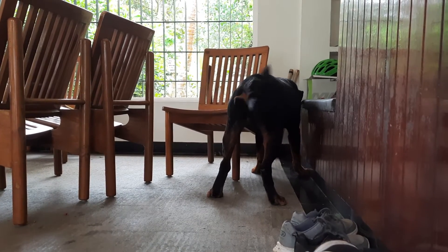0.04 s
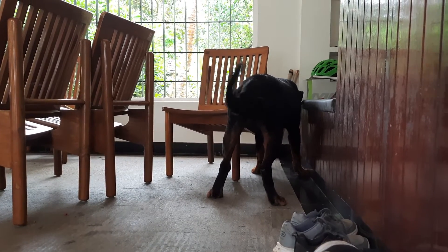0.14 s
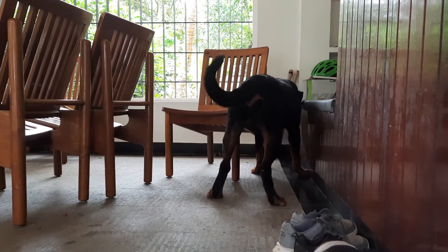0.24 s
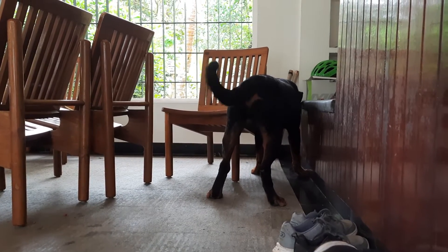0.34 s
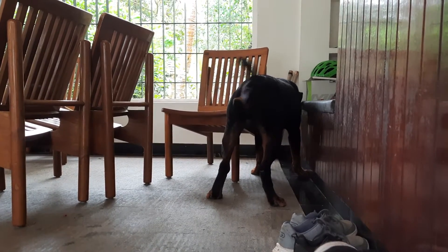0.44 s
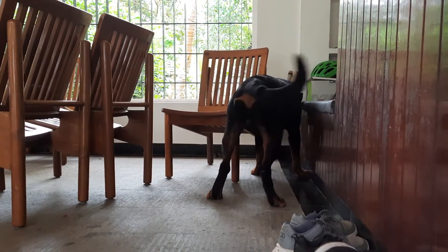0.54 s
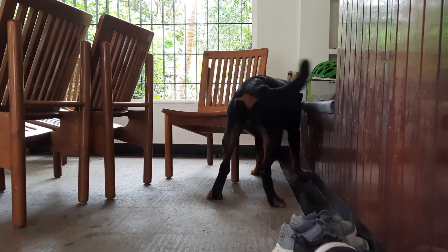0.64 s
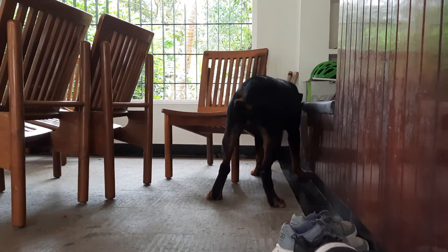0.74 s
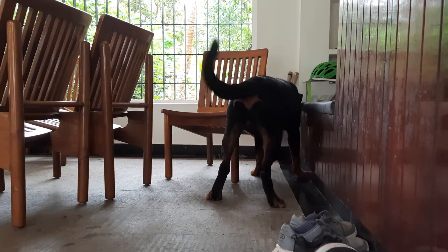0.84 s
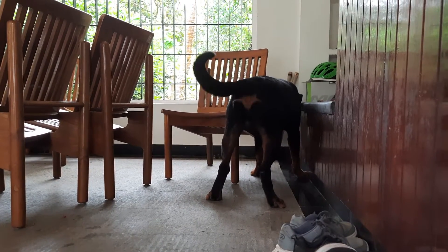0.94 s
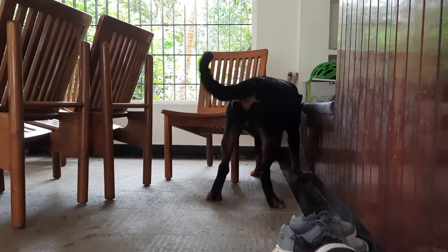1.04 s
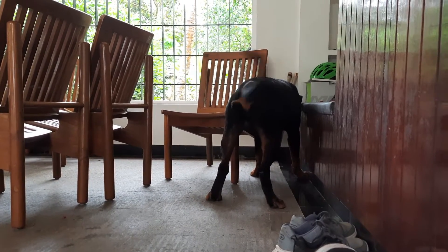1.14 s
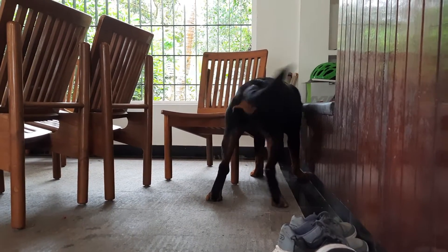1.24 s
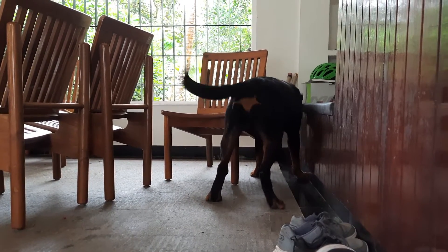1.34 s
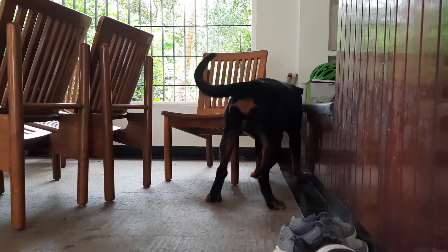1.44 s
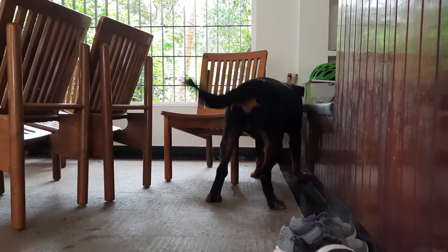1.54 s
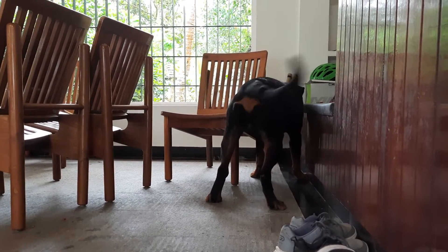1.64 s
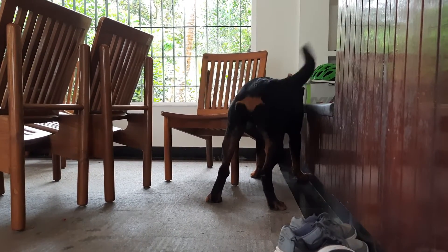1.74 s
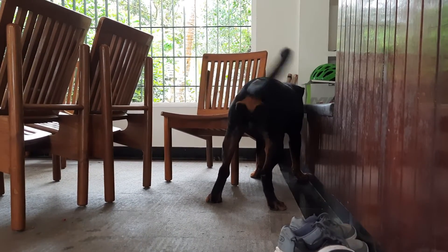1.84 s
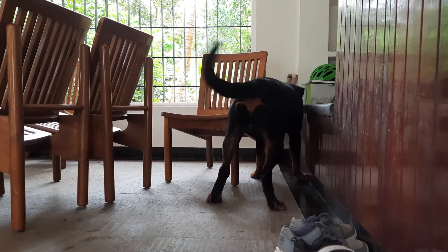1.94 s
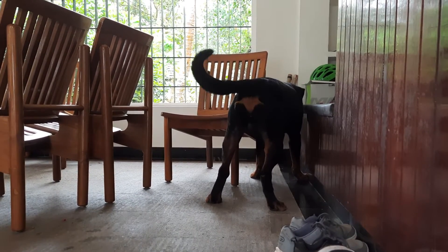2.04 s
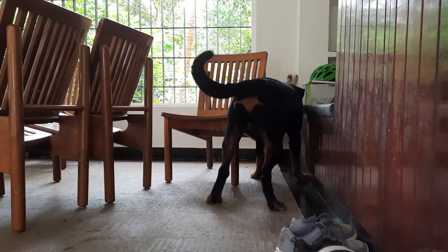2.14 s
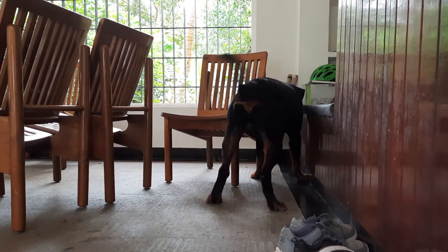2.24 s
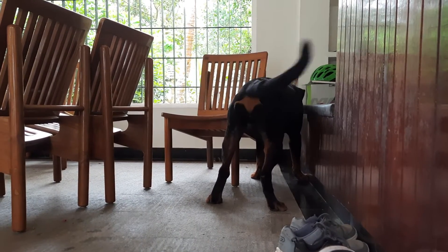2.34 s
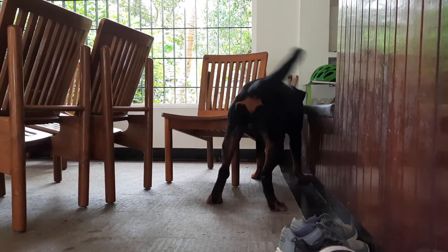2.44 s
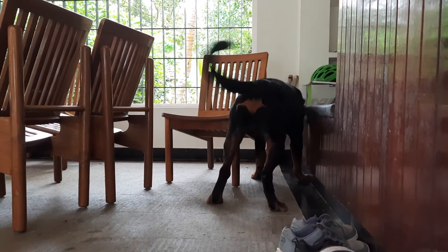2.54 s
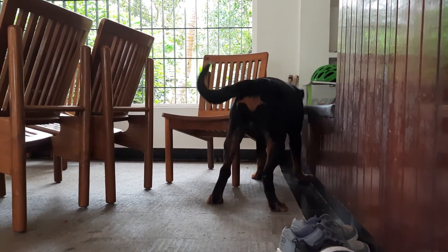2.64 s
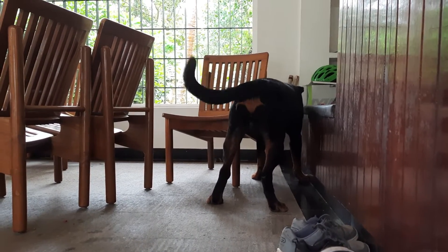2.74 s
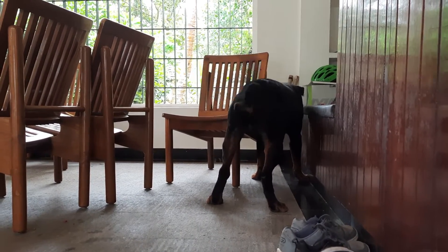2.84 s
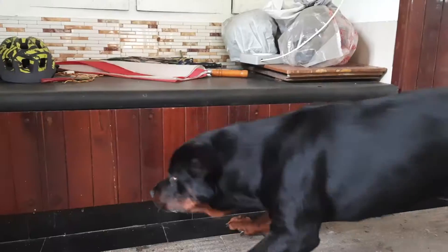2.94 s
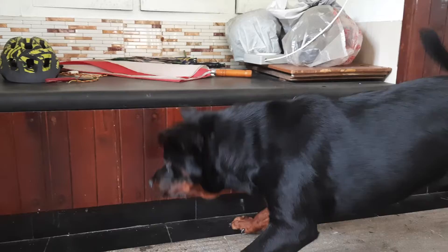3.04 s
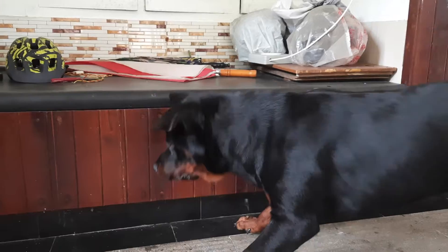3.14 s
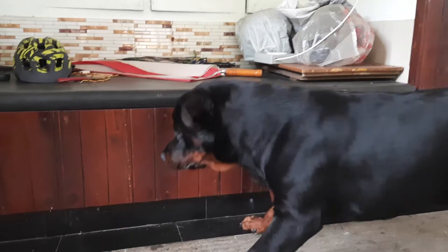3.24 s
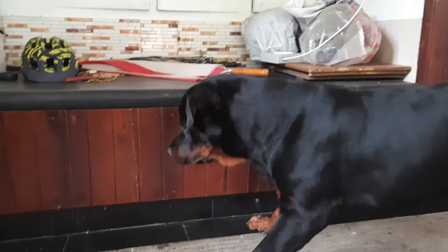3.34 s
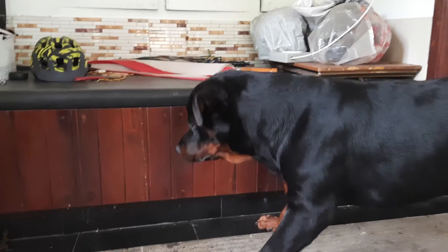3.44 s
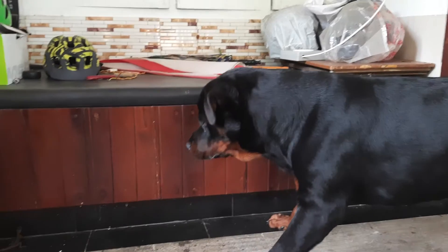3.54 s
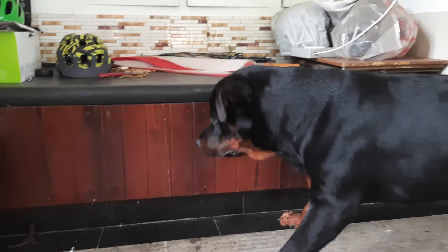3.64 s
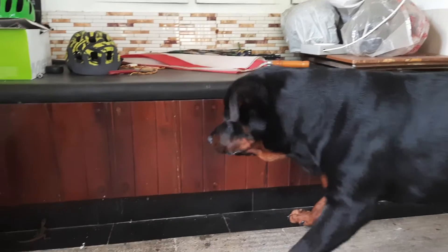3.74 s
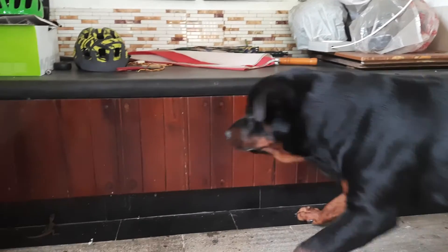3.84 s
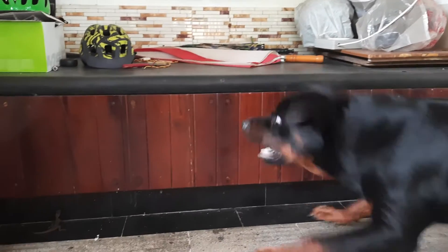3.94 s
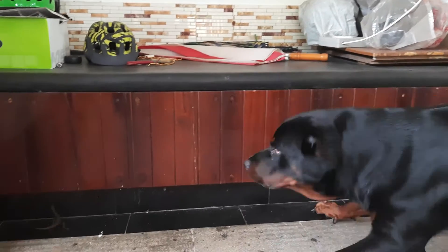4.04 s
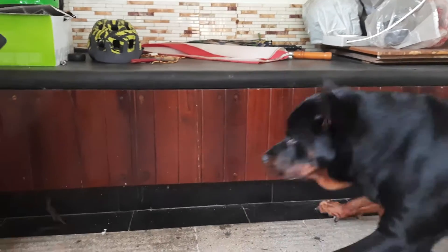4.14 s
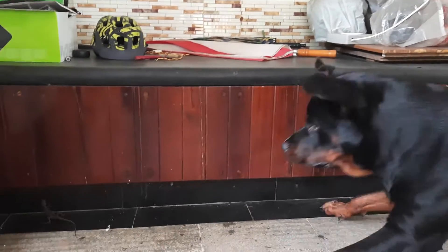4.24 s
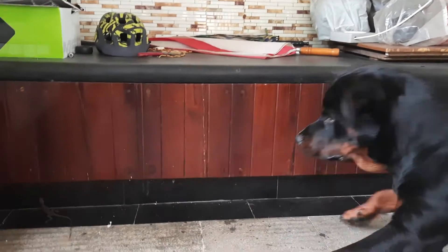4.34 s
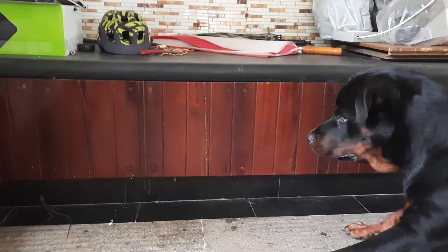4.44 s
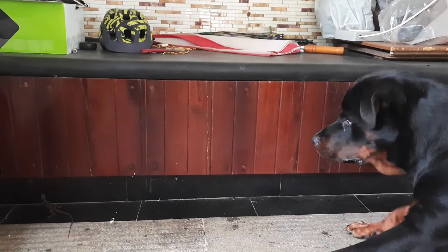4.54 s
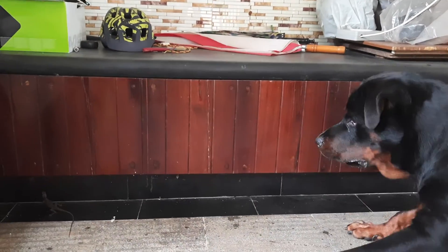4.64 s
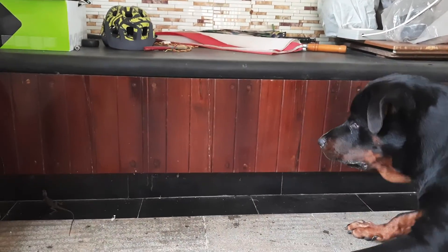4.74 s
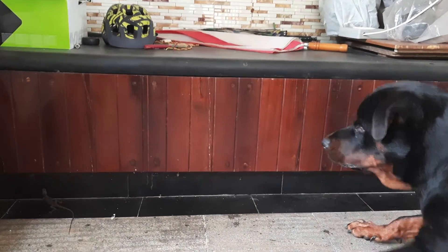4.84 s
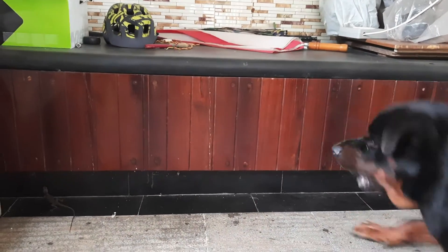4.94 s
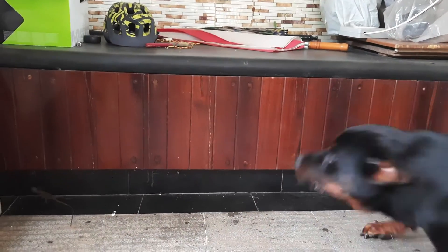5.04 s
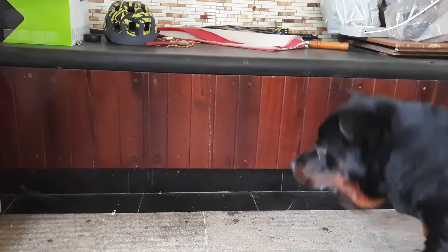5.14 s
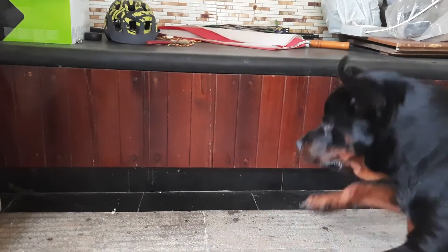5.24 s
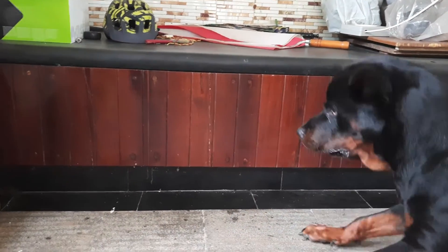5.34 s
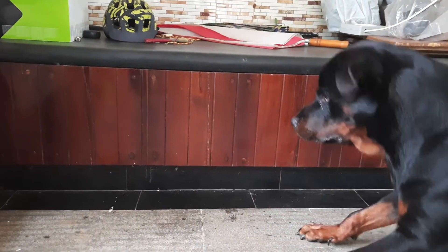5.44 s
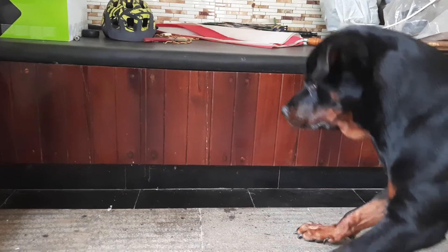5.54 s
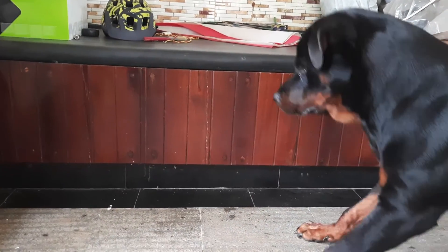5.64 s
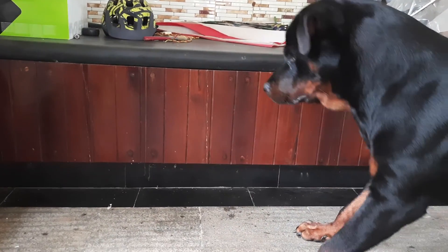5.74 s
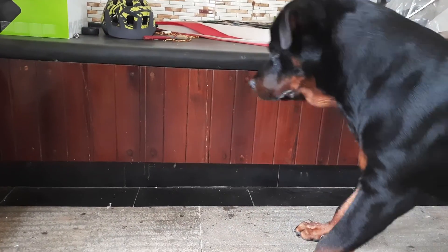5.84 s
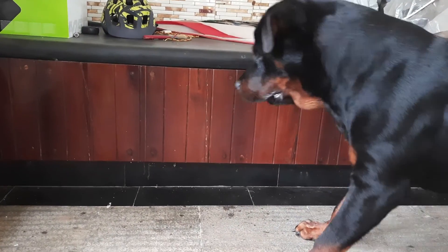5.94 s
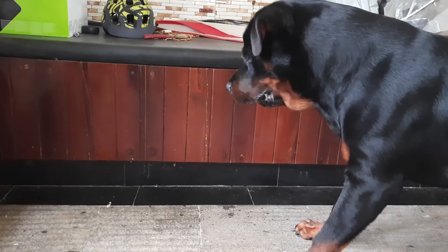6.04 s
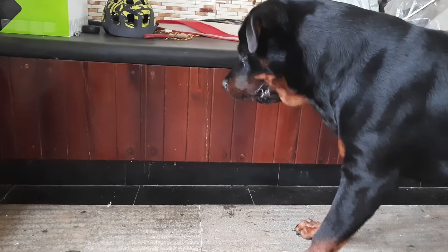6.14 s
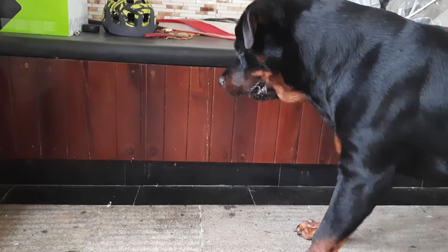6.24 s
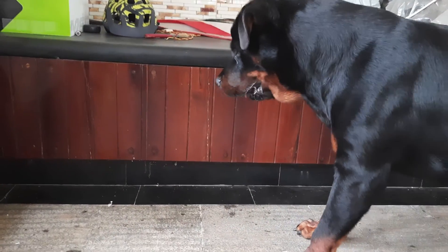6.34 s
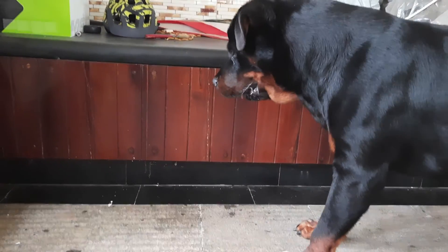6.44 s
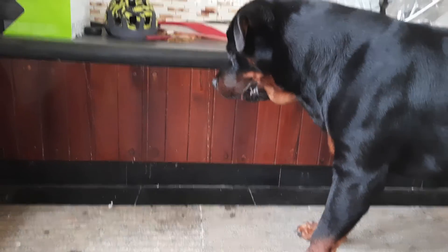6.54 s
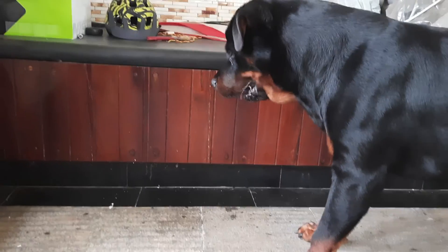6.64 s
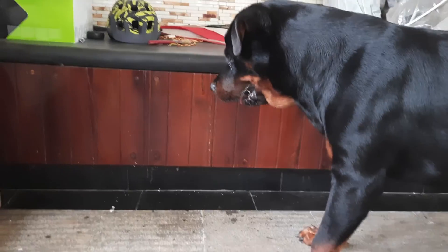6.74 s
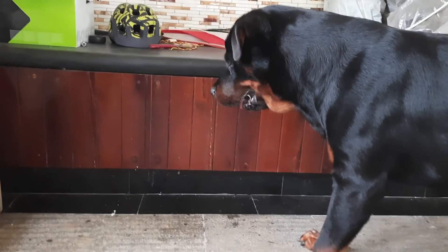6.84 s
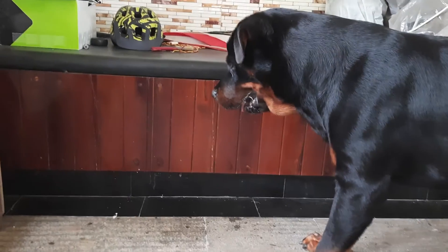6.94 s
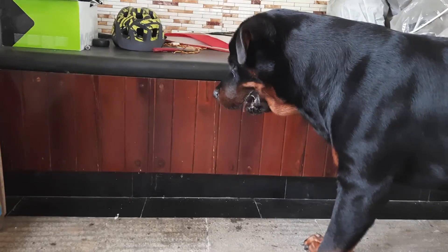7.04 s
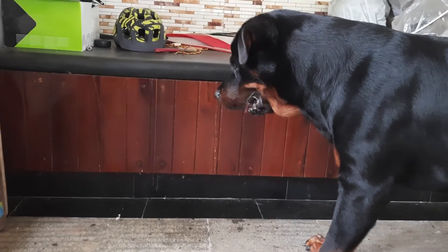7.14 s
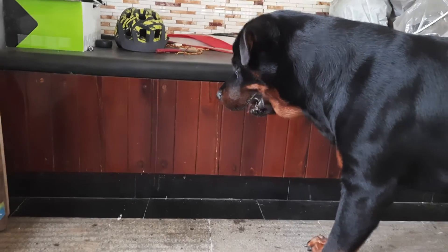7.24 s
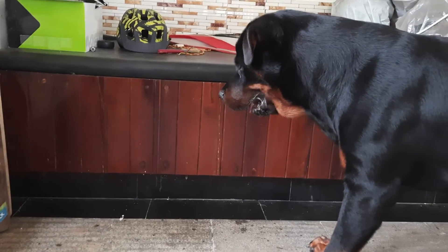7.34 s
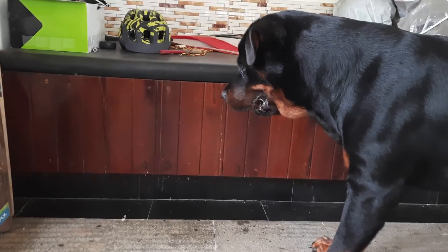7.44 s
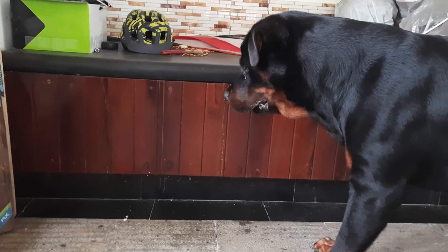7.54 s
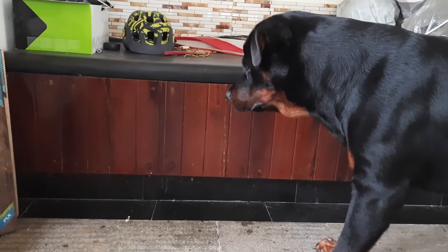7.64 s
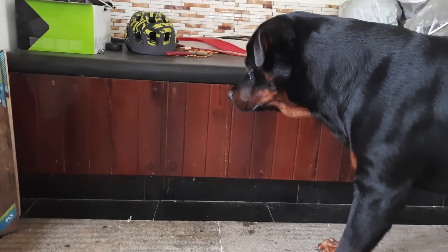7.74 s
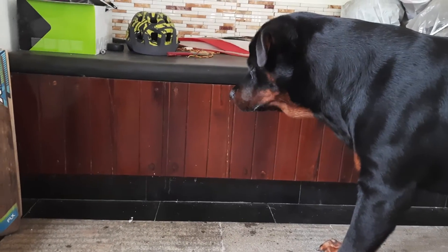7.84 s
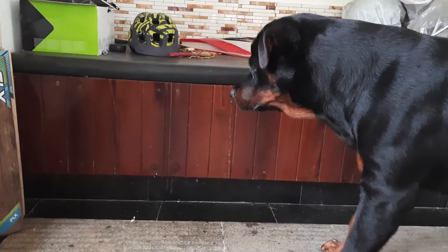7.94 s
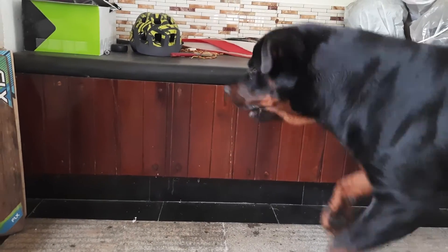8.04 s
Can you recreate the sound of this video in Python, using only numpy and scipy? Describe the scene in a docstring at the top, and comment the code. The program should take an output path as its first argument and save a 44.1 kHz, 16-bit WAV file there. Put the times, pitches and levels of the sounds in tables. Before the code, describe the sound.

Four powerful, hoarse barks, each led in by a growl of separate flaps, come unevenly from a large dog nearby. Thin whimpers, dull thuds and scraping claws fill some gaps; later there are breathy pants while a distant engine hums past. A fifth bark begins right at the end. Hard walls and floor give quick echoes and a half-second ring; background rumble dips, then rises.

```python
"""A young, large dog growls and barks four times on a tiled veranda, and starts a fifth bark.
Each bark is a buzz of rough pulses and air, shaped by throat, cheeks and jaws, and it arches in pitch.
The growls before the barks are runs of separate flaps that ring the chest, mouth and muzzle.
In between come whimpers, panting, claw scuffs and dull, fading thuds, made of shaped tones and noise.
The hard room answers with echoes and a tail; traffic noise and a far engine hum behind it, in uneven level."""
import sys
import numpy as np
from scipy import signal
from scipy.fft import rfft, irfft, next_fast_len
from scipy.io import wavfile
from scipy.ndimage import uniform_filter1d, minimum_filter1d

SR = 44100
rng = np.random.default_rng(int(sys.argv[2]) if len(sys.argv) > 2 else 0)


def transcribe(signal):
    """Save signal, clipped to [-1, 1], as a 16-bit WAV file at the path in sys.argv[1]."""
    frames = np.atleast_2d(signal).T
    limited = np.clip(frames, -1, 1)
    pcm = np.round(limited * 32767).astype(np.int16)
    wavfile.write(sys.argv[1], SR, pcm)


N = 357210
TIME = np.arange(N) / SR


def from_db(db):
    """Turn decibels into a gain."""
    return 10 ** (np.asarray(db) / 20)


def rms_one(x):
    """Scale a sound to an average (rms) level of 1."""
    return x / np.sqrt(np.mean(x ** 2) + 1e-20)


def in_time(rows, t=TIME):
    """Read the columns of a table at times t, with straight lines between its rows."""
    s, *columns = np.transpose(rows)
    return [np.interp(t, s, column) for column in columns]


def at_hz(points, hz):
    """Read a table by frequency, on a logarithmic scale like the ear's."""
    freq, value = np.transpose(points)
    return np.interp(np.log(np.maximum(hz, 1)), np.log(freq), value)


def coloured(x, spectrum):
    """Give a sound a smooth spectrum that falls away beyond its ends."""
    size = next_fast_len(x.shape[-1] + 2048)
    hz = np.arange(size // 2 + 1) * SR / size + 1
    low_end = np.minimum(hz / spectrum[0][0], 1) ** 2
    high_end = np.minimum(spectrum[-1][0] / hz, 1) ** 4
    gain = from_db(at_hz(spectrum, hz)) * low_end * high_end
    return irfft(rfft(x, size) * gain, size)[..., :x.shape[-1]]


def band(x, low_hz, high_hz, order=2):
    """Keep only the sound between two frequencies (Butterworth band-pass)."""
    edges = [low_hz, min(high_hz, SR / 2 - 500)]
    return signal.sosfilt(signal.butter(order, edges, "band", fs=SR, output="sos"), x)


def resonance(x, hz, width_hz):
    """Ring at one frequency (two poles), with gain 1 at the top."""
    r = np.exp(-np.pi * width_hz / SR)
    top = np.array([1, 0, -1]) * (1 - r * r) / 2
    return signal.lfilter(top, [1, -2 * r * np.cos(2 * np.pi * hz / SR), r * r], x)


def moving_resonance(x, hz, width_hz):
    """A resonance whose centre follows hz: shift down, smooth, shift back."""
    turn = np.exp(2j * np.pi * np.cumsum(hz) / SR)
    smoother = signal.butter(2, width_hz / 2, fs=SR, output="sos")
    return np.real(turn * signal.sosfilt(smoother, x / turn))


def drift(rate_hz, t):
    """Wander at random: rate_hz chance values a second, joined by straight lines."""
    knots = np.arange(t[0], t[-1] + 1 / rate_hz, 1 / rate_hz)
    return np.interp(t, knots, rng.standard_normal(4096)[:len(knots)])


def evened(x, window_s=0.018):
    """Hold the short-time level near 1, leaving the faster flutter."""
    return x / np.sqrt(np.abs(uniform_filter1d(x * x, int(window_s * SR))) + 1e-12)


def add(out, s, sound):
    """Mix a sound in at time s."""
    start = int(np.clip(round(s * SR), 0, N - 1))
    out[start:start + len(sound)] += sound[:N - start]


# how alike left and right are in diffuse sound: pitch_hz, likeness (1 is the same, 0 is unrelated)
LEFT_RIGHT_LIKENESS = [(60, 1.0051), (250, 0.84), (500, 0.72), (1000, 0.21), (2000, -0.1), (15000, 0.12)]


def diffuse(size):
    """White stereo noise, alike on both sides in the bass and nearly unrelated in the treble."""
    mid, side = rfft(rng.standard_normal((2, size)))
    alike = np.clip(at_hz(LEFT_RIGHT_LIKENESS, np.arange(len(mid)) * SR / size), -1, 1)
    return irfft(np.sqrt((1 + alike) / 2) * mid + np.sqrt((1 - alike) / 2) * side * [[1], [-1]], size)


# level of the background noise, which fades down after the first bark begins and steps up
#   abruptly near 3.26 s: time_s, traffic_rumble_db, air_db
BACKGROUND_LEVELS = [(0, -48, -55), (1.3, -58, -58), (1.8, -72.5, -78), (3.24, -67, -77),
                     (3.28, -65.5, -68.5), (4.7, -60.5, -64), (6.3, -60, -65.5), (7.3, -43.5, -50),
                     (8.1, -48.5, -50)]
# tone colour of the traffic rumble: pitch_hz, relative_level_db
RUMBLE_COLOUR = [(15, -46), (25, -21), (59, -6), (75, 3), (108, -6.5), (135, -5), (263, -10), (293, -13),
                 (454, -15), (600, -20), (780, -51.5), (1320, -120)]
# tone colour of the wash of air: pitch_hz, relative_level_db
AIR_COLOUR = [(210, -33.5), (350, -6.5), (681, -7.5), (824, -9.5), (1080, -8), (1530, -12), (2310, -9),
              (2620, -14), (3280, -17.5), (3550, -17.5), (4500, -17.5), (11100, -27), (15500, -36)]
# tones of the far engine: multiple_of_firing_rate, relative_level_db
ENGINE_TONES = [(1, -7), (1.379, -9.5), (2, 0), (2.5, -4.5), (3.5, -11.5), (4, -8.5)]
ENGINE_HZ = 68.4   # average firing rate
ENGINE_NEAREST_S, ENGINE_PASS_S, ENGINE_DB = 7.25, .6, -46


def outside():
    """Noise makes traffic rumble and a wash of air; a few tones make an engine that nears and passes."""
    rumble_db, air_db = in_time(BACKGROUND_LEVELS)
    nearness = 1 / (1 + ((TIME - ENGINE_NEAREST_S) / ENGINE_PASS_S) ** 2)
    phase = 2 * np.pi * np.cumsum(ENGINE_HZ * (1 + 0.0097 * drift(5.1, TIME))) / SR
    tones = sum(from_db(db) * np.sin(k * phase) for k, db in ENGINE_TONES)
    hum = from_db(ENGINE_DB) * nearness * tones
    rumble = from_db(rumble_db) * rms_one(coloured(diffuse(N), RUMBLE_COLOUR))
    air = from_db(air_db) * rms_one(coloured(diffuse(N), AIR_COLOUR))
    return hum + rumble + air


# how long the room's tail takes to fall by 60 dB: pitch_hz, fall_s
TAIL_FALL = [(80, 0.9), (250, 0.55), (500, 0.51), (1200, 0.52), (2500, 0.57), (6000, 0.51), (15000, .42)]
# strength of the room's tail: pitch_hz, level_db
TAIL_LEVEL = [(80, -3.5), (200, -6), (400, -9), (800, -7.5), (2000, 0), (6000, 0.5), (15000, -5.5)]
# strength of the side walls' early echoes: pitch_hz, level_db
WALL_ECHO_LEVEL = [(80, -21), (250, -15), (500, -8.5), (1000, -5.5), (2000, -7), (15000, -1.5)]
# standing waves of the room: pitch_hz, level_db, time_to_fall_60_db_s
STANDING_WAVES = [(330.7, -58.5, 0.23), (496.9, -55, 0.17), (763, -57, 0.18), (484, -76, .75),
                  (731, -87.5, 1), (796, -86, 1)]


def room(x, first_echo_s=0.0018, wall_s=0.0027, build_s=0.0017):
    """Side walls answer first, opposite left and right; a tail dies band by band; standing waves ring."""
    t, edges = np.arange(SR) / SR, 45 * 2 ** np.arange(0, 8.6, .5)
    noise, hz = rfft(diffuse(SR)), np.arange(SR // 2 + 1)
    burst = rng.standard_normal(SR) * np.exp(-t / wall_s) * (t > first_echo_s)
    echoes = rms_one(burst) / np.sqrt(SR)
    response = coloured(echoes, WALL_ECHO_LEVEL) * [[1], [-1]]
    for low, high in zip(edges, edges[1:]):
        centre = np.sqrt(low * high)
        shape = from_db(-60 * t / at_hz(TAIL_FALL, centre)) * (1 - np.exp(-t / build_s))
        tail = irfft(noise * ((hz >= low) & (hz < high)), SR) * shape
        # a wider band carries more of the tail
        width_gain = np.sqrt(2 * (high - low)) / SR
        response += from_db(at_hz(TAIL_LEVEL, centre)) * rms_one(tail) * width_gain
    for mode_hz, db, t60 in STANDING_WAVES:
        response += from_db(db - 60 * t / t60) * np.cos(2 * np.pi * mode_hz * t)
    return signal.fftconvolve(x[None], response, axes=1)[:, :N]


# dull, fading thuds; the one at 3.26 s sounds like the ringing tail of a bark: start_s, level_db
THUDS = [(0.53, -48), (0.603, -35), (3.26, -40), (3.31, -44.5), (4.72, -60)]
# tone colour of the thuds: pitch_hz, relative_level_db
THUD_COLOUR = [(120, -53), (200, -19.5), (445, -0.5), (541, -18.5), (682, -15), (759, 0.5), (1040, -29),
               (1160, -24), (1520, -23.5), (2410, -27.5), (3440, -43), (5080, -38.5), (14000, -49)]


def thuds(fall_60_db_s=0.22):
    """Dull noise that starts at once and fades, then rings in the room."""
    out, t = np.zeros(N), np.arange(SR // 3) / SR
    for s, db in THUDS:
        thud = rms_one(coloured(rng.standard_normal(len(t)), THUD_COLOUR))
        add(out, s, from_db(db - 60 * t / fall_60_db_s) * thud)
    return out


# claws scuffing the floor: start_s, level_db, time_to_fall_30_db_s
CLAW_SCUFFS = [(0.632, -48.5, 0.15), (3.9, -64.5, 0.67), (4.352, -62, 0.16), (4.985, -54, 0.54),
               (5.299, -54.5, 0.13), (5.392, -41.5, 0.012), (7.29, -59, 0.075)]
# tone colour of the claws: pitch_hz, relative_level_db
CLAW_COLOUR = [(1500, -15.5), (3500, -4), (6500, -3), (12000, -6), (16000, -10.5)]


def scuffs():
    """Claws scrape the floor: bright noise of uneven, grainy strength that fades."""
    out, t = np.zeros(N), np.arange(SR // 3) / SR
    for s, db, decay in CLAW_SCUFFS:
        grains = rng.standard_normal(len(t)) * np.exp(.5 * drift(500, t))
        add(out, s, from_db(db - 30 * t / decay) * rms_one(coloured(grains, CLAW_COLOUR)))
    return out


# the dog's puffs of air through the muzzle: start_s, length_s, level_db
PUFFS = [(0.116, 0.17, -47), (6.034, 0.17, -53.5), (6.498, 0.18, -51), (6.665, 0.27, -48.5),
         (6.945, .16, -41), (7.146, 0.23, -40.5), (7.277, 0.035, -36.5), (7.382, 0.15, -41.5)]
# tone colour of the puffs: pitch_hz, relative_level_db
PUFF_COLOUR = [(240, -35), (400, -3), (660, -11), (756, -1), (841, -7.5), (964, -2), (1070, -8.5),
               (1470, -16.5), (1880, -9.5), (2960, -26.5), (5030, -30), (12300, -42), (15000, -47)]


def panting():
    """Soft swells of noisy air, coloured by the muzzle."""
    swell = np.zeros(N)
    for s, length, db in PUFFS:
        along = np.clip((TIME - s) / length, 0, 1)
        swell += from_db(db) * np.sqrt(np.abs(np.sin(np.pi * along)))
    return swell * rms_one(coloured(rng.standard_normal(N), PUFF_COLOUR))


# thin whimpers: start_s, length_s, first_pitch_hz, last_pitch_hz, level_db
WHIMPER_ROWS = [(0, 0.057, 472, 489, -35.5), (0.147, 0.15, 780, 814, -42.5), (4.718, .035, 1800, 1750, -62),
                (5.714, .28, 1098, 1106, -63)]


def whimper(s, length, first_hz, last_hz, db, waver=.012):
    """A nearly pure, unsteady tone through the nose that swells and fades."""
    along = np.clip((TIME - s) / length, 0, 1)
    pitch = first_hz + (last_hz - first_hz) * along
    phase = 2 * np.pi * np.cumsum(pitch * (1 + waver * drift(200, TIME))) / SR
    tone = np.sin(phase) + from_db(-17) * np.sin(2 * phase)
    return from_db(db) * np.sin(np.pi * along) * tone


# bouts of growling: first_flap_s, last_flap_s, first_mouth_db, last_mouth_db, first_chest_db,
#   last_chest_db, first_mouth_hz, last_mouth_hz, lateness_of_swell (a power)
GROWL_BOUTS = [(0.648, 1.191, -36.5, -15.5, -22.5, -20.5, 620, 580, 3.6),
               (2.132, 2.465, -53, -22.5, -56, -40, 560, 700, 2.3),
               (3.826, 3.955, -46, -26.5, -32.5, -27, 650, 770, 0.95),
               (4.874, 4.969, -40.5, -30, -49, -33.5, 582, 600, .55),
               (7.902, 8.055, -39, -16.5, -47, -22, 645, 700, 1.1)]
FLAPS_PER_S, FLAP_JITTER_S, FLAP_SPREAD_DB = 27.5, 0.001, 3.55
GROWL_START_DB, GROWL_START_S = 6.5, .07   # the chest joins in over the first flaps


def flaps():
    """Each bout is a nearly even run of flaps that swells towards its end: (s, mouth dB, chest dB, mouth Hz)."""
    for (first, last, mouth_from, mouth_to, chest_from, chest_to,
         hz_from, hz_to, lateness) in GROWL_BOUTS:
        count = int(round((last - first) * FLAPS_PER_S)) + 1
        for along in np.linspace(0, 1, count):
            swell, chance = along ** abs(lateness), rng.standard_normal(3)
            starting_db = GROWL_START_DB * np.exp(-along * (last - first) / GROWL_START_S)
            chest_db = chest_from + (chest_to - chest_from) * along - starting_db
            yield (first + (last - first) * along + FLAP_JITTER_S * chance[0],
                   mouth_from + (mouth_to - mouth_from) * swell + FLAP_SPREAD_DB * chance[1],
                   chest_db + FLAP_SPREAD_DB * chance[2],
                   hz_from + (hz_to - hz_from) * along)


def growl(lead_s=0.0025, rise_s=0.0039, flap_s=0.015, chest_s=0.027, flutter_hz=300, breathy=2.0):
    """Slack folds part about 28 times a second; each flap flutters and rings chest, mouth and muzzle."""
    out, t = np.zeros(N), np.arange(SR // 12) / SR
    for s, mouth_db, chest_db, hz in flaps():
        noise = rng.standard_normal((2, len(t)))
        phase = 2 * np.pi * np.cumsum(flutter_hz * (1 + 0.26 * drift(250, t))) / SR
        flap = rms_one(sum(np.cos(k * phase) for k in range(1, 9))) + breathy * noise[0]
        main_ring = resonance(resonance(flap, hz, 100), hz, 100)
        low_ring = resonance(resonance(flap, 0.56 * hz, 170), 0.52 * hz, 290)
        mouth = evened(band(main_ring - from_db(-4.0) * low_ring, 200, 730, order=4))
        # the muzzle resonance climbs as the growl gains force
        muzzle_hz = 2480.5 + 8 * mouth_db
        muzzle_ring = resonance(resonance(flap, muzzle_hz, 150), muzzle_hz, 220)
        muzzle = from_db(-25.0) * rms_one(muzzle_ring)
        lip_hiss = from_db(-31.5) * rms_one(band(noise[0], 3300, 8100))
        rise_and_fall = (1 - np.exp(-t / rise_s)) * np.exp(-t / flap_s)
        voiced = (mouth + muzzle + lip_hiss) * rise_and_fall
        # the chest gets one sharp push and a fading rustle
        chest_push = 0.51 * noise[1] * np.exp(-t / chest_s) + 8 * (t == 0)
        chest = band(chest_push, 88, 235, order=3)
        chest = chest / np.abs(chest).max()
        add(out, s - lead_s, from_db(mouth_db) * voiced + from_db(chest_db) * chest)
    return out


ONSET_DB, RELEASE_S, RELEASE_DB = 14, .028, 13   # a bark swells from this far below, and dies by this much
SLACK_ROUGHNESS = .78   # folds that are not yet taut
JAW_OPEN_S, JAW_CLOSE_S = .04, .06
MOUTH_SHUT_DB, CHEEK_SHUT_DB = 12, 12   # what the resonances lack at the start
MOUTH_CLOSING_DB, HISS_CLOSING_DB = 8.5, 5   # what mouth and hiss lose as the jaws close
HISS_OUTLASTS = 0.64   # share of the voice's fading that the air stream does not follow
UNSTEADY_DB, UNSTEADY_PER_S = 2.6, 45


def bark_gesture(row, t):
    """One push of breath: the folds tighten, hold and slacken while the jaws fly open and close again."""
    (start, length, attack_s, rise_s, hold_s, relax_s, first_hz, top_hz, last_hz, top_rough, end_rough,
     open_hz, closed_hz, db, sag_db, mouth_db, cheek_db, hiss_db, *_) = row
    age = t - start
    tight = np.clip(age / rise_s, 0, 1)
    spent = 1 - np.exp(-np.maximum(age - rise_s - hold_s, 0) / relax_s)
    opening = np.clip(age / JAW_OPEN_S, 0, 1)
    closing = 1 - np.exp(-(np.maximum(age - JAW_OPEN_S, 0) / JAW_CLOSE_S) ** 2)
    pitch = first_hz + (top_hz - first_hz) * tight + (last_hz - top_hz) * spent
    tightened_rough = SLACK_ROUGHNESS + (top_rough - SLACK_ROUGHNESS) * tight
    rough = np.clip(tightened_rough + (end_rough - top_rough) * spent, 0, 1)
    onset_db = ONSET_DB * np.clip(1 - age / attack_s, 0, 1)
    fade_db = sag_db * spent + RELEASE_DB * np.clip((age - length) / RELEASE_S + 1, 0, 1)
    return (pitch, rough, open_hz + (closed_hz - open_hz) * closing,
            db - onset_db - fade_db + UNSTEADY_DB * drift(UNSTEADY_PER_S, t),
            mouth_db - MOUTH_SHUT_DB * (1 - opening) - MOUTH_CLOSING_DB * closing,
            cheek_db - CHEEK_SHUT_DB * (1 - tight),
            hiss_db + HISS_OUTLASTS * fade_db - HISS_CLOSING_DB * closing)


# barks: start_s, length_s, attack_s, pitch_rise_s, pitch_hold_s, pitch_relax_s, first_pitch_hz,
#   top_pitch_hz, last_pitch_hz, roughness_at_top (0-1), roughness_at_end (0-1), open_cheek_hz,
#   closed_cheek_hz, voice_db, sag_db; then relative to the voice: mouth_db, cheek_db, hiss_db,
#   muzzle_flare_db; and muzzle_flare_hz
BARK_ROWS = [(1.207, 0.21, .021, .08, .022, .052, 262.9, 469.1, 297.8, 0.6, 0.41, 1370, 1195, -7.5, 7, -2.5, -18, -33.5, -30.5, 2304),
             (2.481, 0.21, 0.037, .042, .044, .03, 322.4, 480.1, 315.6, 0.31, 0.83, 1410, 1310, -7.5, 14, -3.5, -20, -36, -29, 2240),
             (3.98, 0.19, 0.026, .066, .03, .026, 360.2, 479.1, 291.8, 0.39, 0.55, 1585, 1110, -11.5, 5, 4, -9.5, -24.5, -15.5, 2390),
             (5.013, 0.18, .022, 0.038, .014, .085, 424.8, 515.7, 300.9, .42, 0.34, 1594, 970, -11, -1.5, -5, -14, -27, -18, 2532),
             (8.081, .2, 0.0031, 0.055, .02, .05, 349, 483, 300, 0.2, .5, 1466, 1120, -13, 6, 5.5, -15, -19.5, -16.5, 2350)]
# tone colour of the throat: pitch_hz, relative_level_db
THROAT_COLOUR = [(120, -32.5), (220, -18.5), (310, -4.5), (480, 1), (630, -7.5), (780, -4.5), (930, -19),
                 (1100, -3.5)]
# tone colour of the sprayed hiss: pitch_hz, relative_level_db
HISS_COLOUR = [(3000, -2.5), (3900, 6), (5000, 3), (7000, -8), (9500, -3.5), (12000, -1), (15500, -12.5)]
# upper resonances of the muzzle, for a cheek resonance of 1300 Hz:
#   pitch_hz, width_hz, relative_level_db, how_closely_it_follows_the_cheeks (0-1)
UPPER_RESONANCES = [(1711, 250, -6.5, 1), (2114, 250, -4, 0.4), (2930, 500, -10.5, 0.2),
                    (4000, 1400, -17.5, 0.1)]
# air whistling past the teeth, before it wanders: pitch_hz, width_hz, relative_level_db
TEETH_WHISTLES = [(5530, 830, -4), (6540, 1500, -6), (8040, 2400, -10.5)]
TURBULENCE, CHEEK_AIR = 1.6, .8   # noisy air mixed into the voice and the cheeks
FLARE_WIDTH_HZ, FLARE_SINK_HZ_PER_S = 500, 1800   # muzzle resonance that flares as the jaws snap open
TEETH_FLICKER_DB = 3.5
TEETH_WANDER, TEETH_OPEN_RISE = 0.052, .12   # the whistling unsteadily follows the cheeks upwards


def bark(row, jitter=.085, shimmer=1.0, doubling=0.64, snap_s=0.019, cheek_width_hz=310, wander=0.023,
         edge_s=0.011, hiss_rise_s=0.03):
    """Hard-driven folds beat unevenly and chop the air stream; throat, cheeks and open jaws shape it."""
    start, length, *_, flare_db, flare_hz = row
    t = start + np.arange(SR // 3) / SR
    pitch, rough, cheek_hz, voice_db, mouth_db, cheek_db, hiss_db = bark_gesture(row, t)
    phase = 2 * np.pi * np.cumsum(pitch * (1 + jitter * rough * drift(320, t))) / SR
    pulses = rms_one(sum(np.cos(k * phase) / k ** 0.033 for k in range(1, 13)))
    # strong and weak beats alternate, and loose tissue flutters on top
    pulses = pulses * (1 + doubling * rough * np.cos(phase / 2))
    flutter = np.exp(shimmer * rough * drift(210, t))
    air = rng.standard_normal(len(t)) * (1 + 2.4 * np.cos(phase))
    source = (pulses + TURBULENCE * rough * air) * flutter

    throat = coloured(source, THROAT_COLOUR)
    voice = evened(band(throat, 190, 620, order=4))
    mouth = from_db(mouth_db) * evened(band(throat, 663, 900, order=4))
    cheek_ring = moving_resonance(source + CHEEK_AIR * air, cheek_hz, cheek_width_hz)
    cheek = from_db(cheek_db) * evened(cheek_ring)

    # the upper resonances slide with the cheeks and grow with both the cheek resonance and the hiss
    cheek_ratio = cheek_hz / 1300
    upper = 0
    for hz, width, db, follow in UPPER_RESONANCES:
        upper_hz = hz * cheek_ratio ** follow * (1 + wander * drift(30, t))
        upper = upper + from_db(db) * evened(moving_resonance(source + air, upper_hz, width))
    rasp = from_db((cheek_db + hiss_db) / 2 + 1.5) * upper

    # the muzzle flares briefly as the jaws snap open
    since_snap = t - start - snap_s
    sinking_hz = flare_hz - FLARE_SINK_HZ_PER_S * since_snap
    flare_ring = evened(moving_resonance(source + air, sinking_hz, FLARE_WIDTH_HZ))
    flare = from_db(flare_db) * np.exp(-(since_snap / 0.021) ** 2) * flare_ring

    teeth = 0
    for hz, width, db in TEETH_WHISTLES:
        flicker = from_db(db + TEETH_FLICKER_DB * drift(35, t))
        whistle_hz = hz * cheek_ratio ** TEETH_OPEN_RISE * (1 + TEETH_WANDER * drift(25, t))
        teeth = teeth + flicker * evened(moving_resonance(air * flutter, whistle_hz, width))
    # a stronger jet of air spreads its hiss more widely over the treble
    spray = from_db(0.53 * (hiss_db + 28.5) - 4) * evened(coloured(air * flutter, HISS_COLOUR))
    hiss_rise = 1 - np.exp(-(t - t[0]) / max(hiss_rise_s, 1e-3))
    hiss = from_db(hiss_db) * (teeth + spray) * hiss_rise

    chest = from_db(-29) * evened(band(air, 98, 160))
    fade_in = np.clip((t - t[0]) / edge_s, 0, 1)
    fade_out = np.clip((start + length - t) / edge_s + 1, 0, 1)
    layers = voice + mouth + cheek + rasp + flare + hiss + chest
    return fade_in * fade_out * from_db(voice_db) * layers


# left-right balance of all sounds heard through the room: pitch_hz, left_minus_right_db
LEFT_RIGHT_BALANCE = [(100, .5), (400, -0.65), (1200, 1), (2400, 2.5), (4500, 0), (7000, -5.5), (9500, 9.5),
                      (15000, 9)]


def scene():
    """The dog and thuds in the room, their left-right balance varying with pitch, over the background."""
    indoors = growl() + panting() + sum(whimper(*row) for row in WHIMPER_ROWS) + thuds() + scuffs()
    for row in BARK_ROWS:
        add(indoors, row[0], bark(row))
    heard = from_db(-3.5) * indoors + room(indoors)
    hz = np.arange(N // 2 + 1) * SR / N
    # each side takes half of the difference
    side_gain = from_db(at_hz(LEFT_RIGHT_BALANCE, hz) * [[.5], [-.5]])
    return irfft(rfft(heard) * side_gain, N) + outside()


CUTOFF_HZ = 15800


def record(dry, ceiling=1.0, hold_s=0.02):
    """A limiter ducks the loudest peaks, and a steep filter cuts the top treble."""
    size = int(hold_s * SR)
    needed = np.minimum(1, min(ceiling, 1) / (np.abs(dry).max(axis=0) + 1e-9))
    limited = dry * uniform_filter1d(minimum_filter1d(needed, size), size)
    return signal.sosfilt(signal.ellip(10, .2, 80, CUTOFF_HZ, fs=SR, output="sos"), limited)


dry = scene()
out = record(dry)
transcribe(out)
```